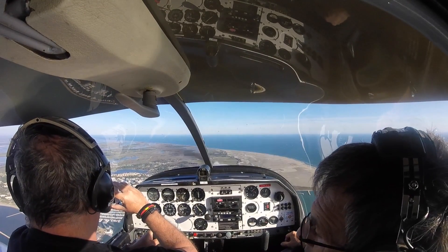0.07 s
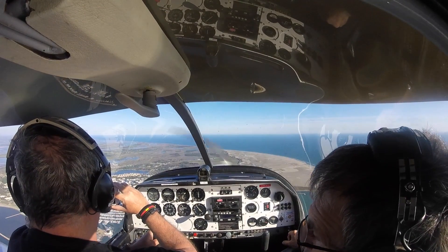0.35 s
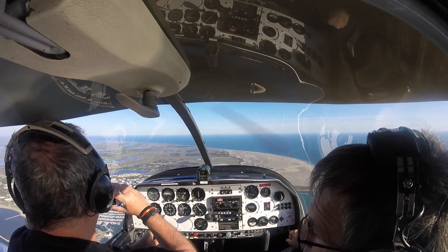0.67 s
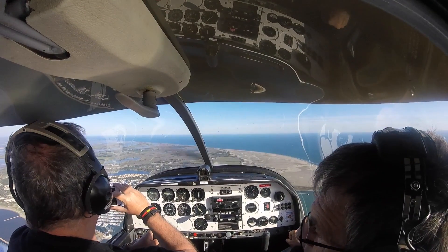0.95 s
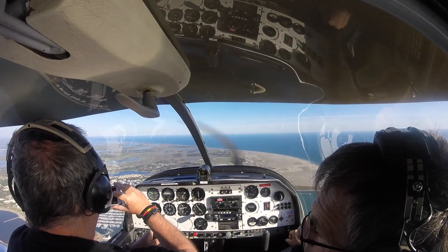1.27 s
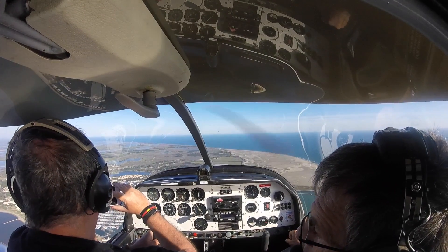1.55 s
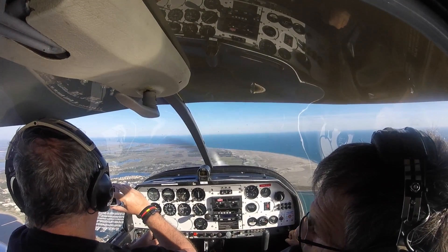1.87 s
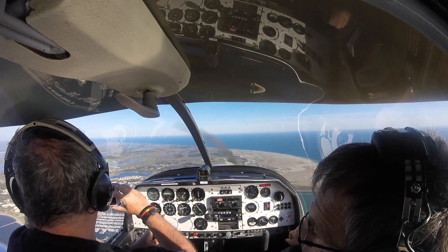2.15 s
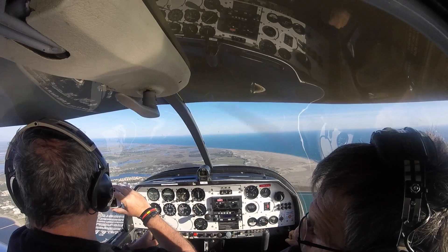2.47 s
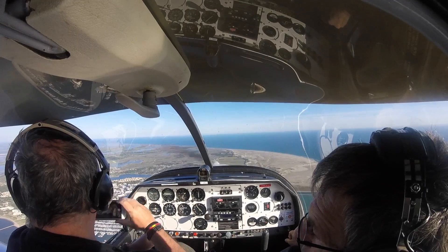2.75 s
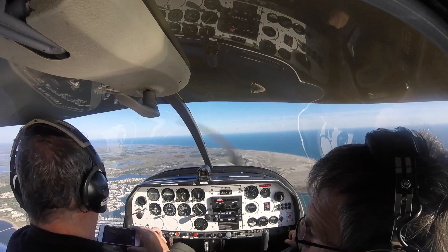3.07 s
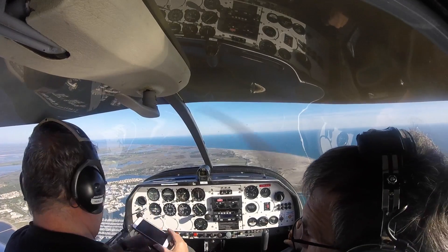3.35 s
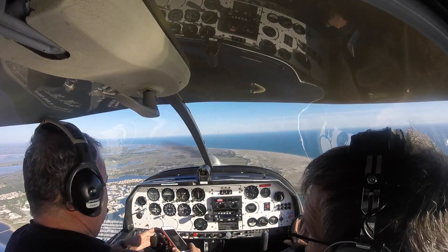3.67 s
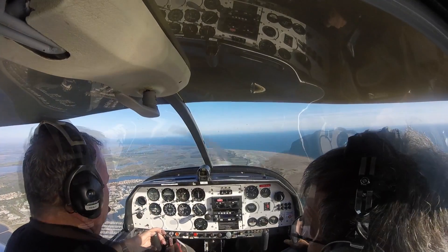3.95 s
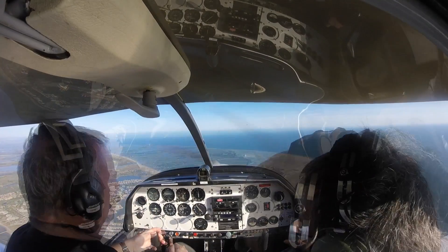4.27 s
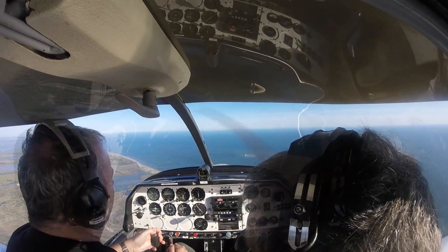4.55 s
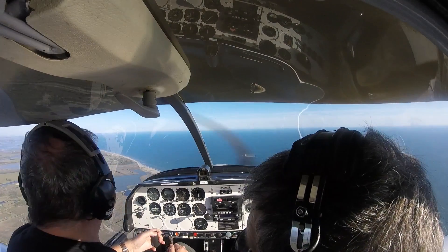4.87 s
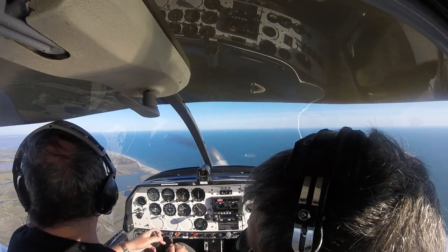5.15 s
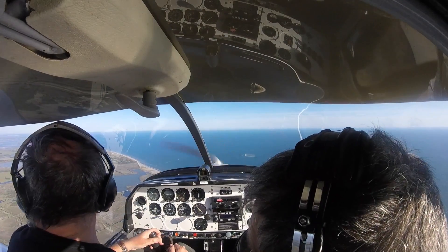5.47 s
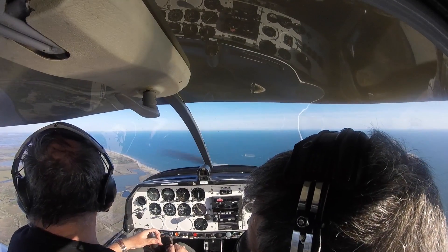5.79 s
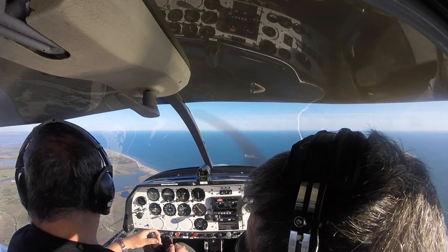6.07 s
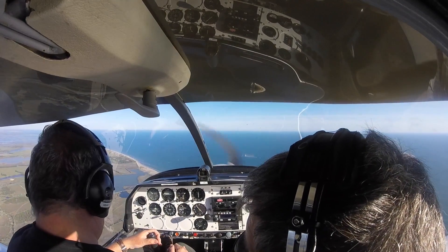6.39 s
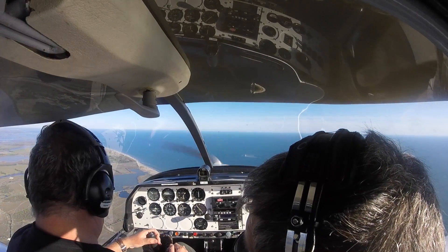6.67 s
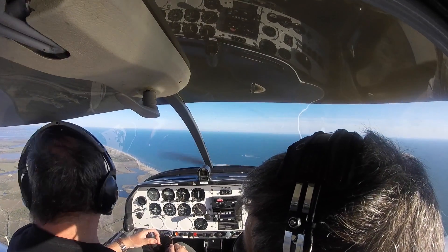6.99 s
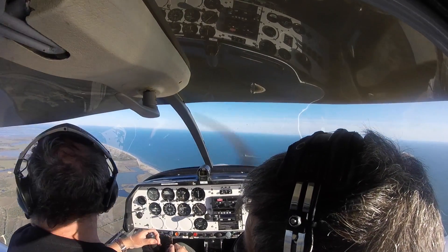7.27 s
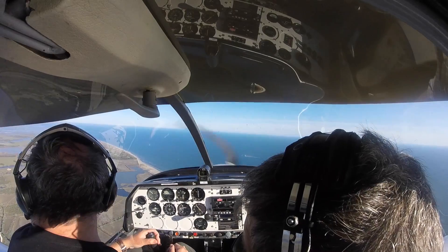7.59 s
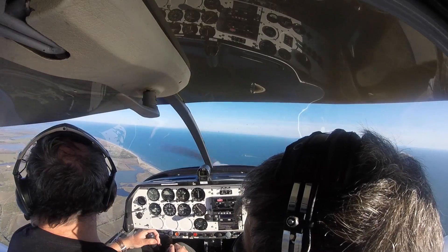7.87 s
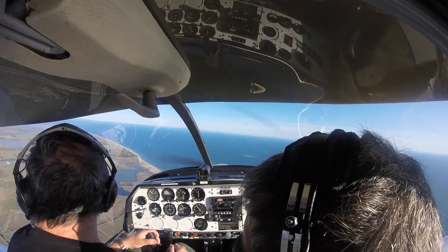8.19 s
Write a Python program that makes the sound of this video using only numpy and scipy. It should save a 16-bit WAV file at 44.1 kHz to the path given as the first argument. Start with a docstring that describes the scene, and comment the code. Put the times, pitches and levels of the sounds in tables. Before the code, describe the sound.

A single-engine propeller plane drones loudly in cruise for about eight seconds, heard inside the cockpit, close behind the piston engine. From the start, a deep engine and propeller throb sits under a rapid, uneven, raspy patter of exhaust puffs, while the slipstream roars steadily around the cabin. Harder exhaust barks poke out irregularly, the strongest at about 1.5 seconds, with clusters near 3.8, 6.3 and 7.5 seconds. The cabin's low boom swells briefly around 0.9, 2, 5.6 and 8 seconds, and the roar dips slightly near 2.3 seconds. Between roughly 3.9 and 4.7 seconds the drone blends smoothly into slightly higher revs, which hold to the end. Very faint valve ticking runs underneath, and loose fittings give small, high ticks at about 0.8, 4.4, 5.7 and 7.3 seconds.

```python
"""Cockpit of a propeller plane in cruise

The microphone is inside the cabin, close behind the single piston engine. Engine and propeller throb in
low orders, uneven exhaust puffs bark through the firewall, and the slipstream sets the cabin air and
panels booming. Valves and loose fittings tick faintly. Halfway, one stretch of cruise dissolves into
another at slightly higher revs."""
import sys
import numpy as np
from scipy import signal
from scipy.fft import rfft, irfft, next_fast_len
from scipy.io import wavfile
from scipy.ndimage import uniform_filter1d, minimum_filter1d, map_coordinates

SR = 44100
rng = np.random.default_rng(int(sys.argv[2]) if len(sys.argv) > 2 else 0)


def to_wav(sig):
    """Store sig (one row per channel, or 1-D mono) as 16-bit WAV at the path in sys.argv[1].

    Samples outside -1..1 are clipped; the rate is SR.
    """
    pcm = np.clip(np.atleast_2d(sig), -1, 1) * 32767
    pcm = np.round(pcm).astype(np.int16)
    wavfile.write(sys.argv[1], SR, pcm.T)  # frames by channels


N = 367353


# engine and propeller tones from just ahead, per stretch: multiple_of_cycle_rate, level_db
ORDERS_FIRST = [(2, -18), (3, -29), (4, -26), (5, -40.5), (6, -30), (7, -43), (8, -31), (9, -40),
                (11, -28.5), (12, -28.5), (13, -34.5), (14, -34), (15, -35), (16, -37.5), (18, -41),
                (20, -45), (24, -51), (40, -46.5)]
ORDERS_SECOND = [(2, -16), (3, -31), (4, -34), (5, -49), (6, -26.7), (8, -29.5), (9, -41), (10, -35.5),
                 (11, -32.5), (12, -24), (13, -41.5), (15, -36.5), (16, -39), (20, -35.5), (24, -49.5),
                 (40, -44.5)]

def drone(turn, orders, puffs, lag_rad, waver_db=0.82, sway_rad=.08):
    """Low engine and propeller orders, their crests trailing the pattern of the exhaust puffs."""
    place, puff_db = np.transpose(puffs)[:2]
    out = np.zeros(N)
    for order, db in orders:
        puff_phase = np.angle(np.sum(amp(puff_db) * np.exp(-2j * np.pi * order * place)))
        phase = 2 * np.pi * order * turn + puff_phase - lag_rad + sway_rad * wobble(4.4)
        out += np.sqrt(2) * amp(db + waver_db * wobble(7)) * np.cos(phase)
    return out


# exhaust puffs behind the firewall, per stretch: place_cycles, peak_db, ring_hz, swell_s
PUFFS_FIRST = [(.006, -14, 1457, 0.002706), (0.114, -21.5, 1686, 0.00204), (0.162, -15.5, 1550, 0.00199),
               (.16, -19, 1960, 0.00144), (0.283, -23, 1460, 0.0025), (.51, -17.5, 1477, 0.00268),
               (.62, -25, 1500, 0.00231), (.755, -22, 1423, 0.00233), (.868, -19, 2550, 0.002054)]
PUFFS_SECOND = [(0, -15.5, 1504, 0.00278), (.125, -23, 1476, 0.00312), (.135, -25, 1970, .0015),
                (.497, -17.5, 1480, 0.002403), (.83, -29, 2566, 0.00275)]
# hard firings, each replacing a low-ringing puff that crests at that moment: time_s, peak_db
HARD_FIRINGS = [(0.6804, -9), (1.0575, -10), (1.1318, -11), (1.5349, -6), (1.8866, -8), (2.139, -8.5),
                (2.4917, -9.5), (2.8938, -10), (3.7254, -9.5), (3.7509, -11), (3.9015, -10), (5.3038, -11),
                (5.5019, -9.5), (5.6496, -12.5), (6.1948, -10), (6.2432, -10), (6.3425, -9.5),
                (7.4814, -10), (7.5308, -9), (7.5807, -9.5), (7.8775, -10), (8.1, -10), (8.1743, -10.5),
                (8.2741, -11)]
# the highest-ringing puff stands out at first: time_s, gain_db
BRIGHT_PUFF = [(0, -15), (.17, 4.5), (.45, -1.5), (.63, 9.5), (.76, -4)]
# turbulence of the escaping gas: frequency_hz, relative_db
GAS_SPECTRUM = [(400, -43.5), (1050, -1), (2000, 3.5), (2700, -4), (4500, -36), (9000, -52.5)]

def exhaust(turn, puffs, flow_db, rasp, jitter_s=0.00024, scatter_db=1.9, detune=.018, glide=.2):
    """Each puff swells and dies in a few ms, gliding up into its ring; turbulent gas adds a rasp."""
    t = np.arange(SR // 50) / SR
    cycle = np.arange(np.floor(turn[0]), np.ceil(turn[-1]))
    hard_s, hard_db = np.transpose(HARD_FIRINGS)
    surge_db = 0.96 * flow_db + .5 * wobble(6)
    ring, outflow = np.zeros(N), np.zeros(N)
    for place, db, hz, swell_s in puffs:
        # no two firings are alike
        size, late, pitch, angle = rng.standard_normal((len(cycle), 4)).T[:, :, None]
        crest_s = np.interp(cycle + place, turn, np.arange(N), left=-N, right=-N)[:, None] / SR
        peak_db = db + np.interp(crest_s * SR, np.arange(N), surge_db) + scatter_db * size
        peak_db += (hz > 2200) * np.interp(crest_s, *np.transpose(BRIGHT_PUFF))
        hard = (np.abs(crest_s - hard_s) < .003) & (hz < 1650)
        hard_ring_db = hard @ hard_db - 0.3  # the ring's part of a hard peak
        peak_db = np.where(hard.any(axis=1), hard_ring_db, peak_db[:, 0])[:, None]
        age = t / swell_s
        envelope = amp(peak_db) * (age * np.exp(1 - age)) ** 4
        ring_hz = hz * (1 + detune * pitch - glide / (1 + (age / 0.78) ** 5))
        phase = 2 * np.pi * np.cumsum(ring_hz, axis=1) / SR + np.pi * angle
        at = np.round(SR * (crest_s + t - swell_s + jitter_s * late)).astype(int)
        inside = (at >= 0) & (at < N)
        ring += np.bincount(at[inside], (envelope * np.sin(phase))[inside], N)
        outflow += np.bincount(at[inside], envelope[inside], N)
    gas = unit(noise(lambda hz: along(GAS_SPECTRUM, hz) + panels(hz)))
    return ring + rasp * outflow * gas


def buzz(turn, puffs, width_cycles=0.01):
    """The steep front of each puff repeats exactly, and draws a comb of fine lines above the drone."""
    fronts = sum(amp(db) * gate(turn, place, width_cycles) for place, db, _, _ in puffs)
    colour_hz_db = [(150, -46.0), (330, 7.0), (500, 6.0), (900, -5.5), (2000, -28.0)]
    return unit(filtered(fronts, lambda hz: amp(along(colour_hz_db, hz))))


# slipstream and engine roar all around the microphone: frequency_hz, density_db
ROAR_SPECTRUM = [(18, -68), (33, -49), (200, -49.5), (320, -48), (500, -65), (880, -67.5), (1400, -59),
                 (2700, -68), (3600, -78), (4900, -91.5), (7200, -88.5), (9100, -96.5), (10200, -106),
                 (15000, -119)]
# swells of the cabin's boom: centre_s, rise_db
BOOM_SWELLS = [(.87, 3), (1.33, 1), (2.08, 3.5), (5.6, 3.2), (8.0, 2.5)]

def roar(flow_db, boom_hz=420, swell_s=0.091):
    """Turbulent air heard through the cabin's resonances; its low boom swells and sinks."""
    t = np.arange(N) / SR
    swells_db = sum(db * np.exp(-((t - s) / swell_s) ** 2) for s, db in BOOM_SWELLS)
    air = noise(lambda hz: along(ROAR_SPECTRUM, hz) + panels(hz))
    boom = filtered(air, lambda hz: 1 / (1 + (hz / boom_hz) ** 6))
    boom_db = 0.65 * flow_db + swells_db - 0.15
    rush_db = flow_db + 0.5 * wobble(11)
    return boom * amp(boom_db) + (air - boom) * amp(rush_db)


# the cabin's peaks and dips at the microphone: centre_hz, width_hz, gain_db
CABIN_RESONANCES = [(260.5, 36.2, 11), (610, 78, 2.5), (2060, 88, -14), (2366, 390, 3.5), (3280, 80, 4),
                    (3785, 200, -5), (4070, 300, 5.5), (5890, 370, 6), (6500, 180, 7), (6600, 150, -0.5),
                    (10920, 550, 6)]

def panels(hz):
    """The colour, in dB, that the cabin's air mode and panels give to noise."""
    return sum(db * np.exp(-np.log(2) * (2 * (hz - centre) / width) ** 2)
               for centre, width, db in CABIN_RESONANCES)


# loose fittings nearby in the cabin: start_s, level_db, pitch_hz
FITTINGS = [(.842, -43, 5550), (4.426, -48, 5500), (5.663, -42, 5640), (7.27, -46, 8200)]

def rattles(t60_s=0.037, spread=0.058):
    """Each loose fitting ticks, ringing briefly with a cluster of close modes."""
    out, t = np.zeros(N), np.arange(SR // 20) / SR
    attack = 1 - np.exp(-t / 0.00039)
    for start_s, db, hz in FITTINGS:
        modes_hz = hz * (1 + spread * rng.standard_normal(size=(6, 1)))
        ring = unit(np.sin(2 * np.pi * modes_hz * t).sum(axis=0))
        out[round(start_s * SR):][:len(t)] += amp(db - 60 * t / t60_s) * attack * ring
    return out


# valve ticks from the engine ahead: place_cycles, peak_db
VALVE_TICKS = [(.69, -63.5), (.925, -63)]
# colour of a tick: frequency_hz, relative_db
TICK_SPECTRUM = [(4000, -22.5), (6500, -10.5), (8600, -5.5), (10000, -6.5), (11500, 2), (13200, 5),
                 (14200, -15.5), (15000, -25)]

def valves(turn, width_cycles=.028, scatter_db=1.6):
    """Faint bright ticks tied to the camshaft."""
    envelope = sum(amp(db + scatter_db * wobble(23)) * gate(turn, place, width_cycles)
                   for place, db in VALVE_TICKS)
    return envelope * unit(noise(lambda hz: along(TICK_SPECTRUM, hz)))


def amp(db):
    """Decibels to gain."""
    return 10 ** (np.asarray(db) / 20)


def unit(x):
    """Scale to rms 1."""
    return x / np.sqrt(np.mean(x ** 2) + 1e-20)


def along(points, hz):
    """(Hz, value) points read on a log axis."""
    point_hz, values = np.transpose(points)
    return np.interp(np.log(hz + 1), np.log(point_hz + 1), values)


def curves(rows):
    """One value per sample for each column after the time."""
    time_s, *columns = np.transpose(rows)
    return [np.interp(np.arange(N) / SR, time_s, column) for column in columns]


def wobble(rate):
    """A smooth random curve, rate knots a second."""
    knots = rng.standard_normal(int(N * rate / SR) + 4)
    return map_coordinates(knots, [np.arange(N) * rate / SR])


def filtered(x, response):
    """Filter x by a gain given as a function of frequency."""
    size = next_fast_len(N + SR // 2)
    return irfft(rfft(x, size) * response(np.fft.rfftfreq(size, 1 / SR)), size)[:N]


def noise(level_db):
    """Noise whose density in dB per Hz is the given function of frequency."""
    return filtered(rng.standard_normal(N), lambda hz: amp(level_db(hz)) * np.sqrt(SR / 2))


def gate(turn, place, width):
    """A smooth window that opens once a cycle."""
    return np.exp(-(((turn - place + .5) % 1 - .5) / width) ** 2)


def cycles(speed, bark_s):
    """Engine cycles counted from a moment at which the loudest cylinder barks."""
    turn = np.cumsum(curves(speed)[0]) / SR
    return turn - np.interp(bark_s * SR, np.arange(N), turn)


# strength of the airflow past the cabin: time_s, gain_db
AIRFLOW = [(0, 0), (1.35, 0.3), (1.9, -0.6), (2.3, -2.5), (2.7, 0.4), (3.7, 1), (4.6, -0.4), (5.55, 0.4),
           (6.07, -0.5), (6.3, 0.3), (6.67, -0.2), (7.5, 0.4), (8.33, 0)]

def cruise(turn, orders, puffs, lag_rad, roar_db, buzz_db, rasp):
    """Steady flight: the engine sounds share one cycle; hum, bark and roar swell with the airflow."""
    flow_db, = curves(AIRFLOW)
    hum = drone(turn, orders, puffs, lag_rad) + amp(buzz_db) * buzz(turn, puffs)
    hum *= amp(0.54 * flow_db)
    return hum + exhaust(turn, puffs, flow_db, rasp) + amp(roar_db) * roar(flow_db) + valves(turn)


# engine speed per stretch, two crank turns to a cycle: time_s, cycle_rate_hz
SPEED_FIRST = [(0, 19.874), (1.1, 19.882), (3.1, 19.841), (4.5, 19.874)]
SPEED_SECOND = [(4.4, 20.196), (5.35, 20.235), (6.2, 20.2), (8.33, 20.195)]
# the dissolve between the stretches: time_s, first_gain, second_gain
DISSOLVE = [(3.85, 1, 0), (4.23, .63, .45), (4.7, 0, 1)]

def scene():
    """Two stretches of cruise heard in mono from the cockpit, one fading into the other."""
    fade_out, fade_in = curves(DISSOLVE)
    first = cruise(cycles(SPEED_FIRST, bark_s=1.5861), ORDERS_FIRST, PUFFS_FIRST,
                   lag_rad=.25, roar_db=0.77, buzz_db=-48.5, rasp=0.28)
    second = cruise(cycles(SPEED_SECOND, bark_s=5.8986), ORDERS_SECOND, PUFFS_SECOND,
                    lag_rad=.8, roar_db=0.08, buzz_db=-53, rasp=0.21)
    return (fade_out * first + fade_in * second + rattles())[None]


def record(dry):
    """A limiter after the microphone eases down the hardest barks; a steep low-pass ends the treble."""
    ceiling, hold_samples, top_hz = .8, SR // 200, 15100
    gain = minimum_filter1d(ceiling / np.maximum(np.abs(dry), ceiling), 2 * hold_samples)
    gain = uniform_filter1d(uniform_filter1d(gain, hold_samples), hold_samples)
    return signal.sosfiltfilt(signal.butter(16, top_hz, fs=SR, output="sos"), dry * gain)


dry = scene()
out = record(dry)
to_wav(out)
```